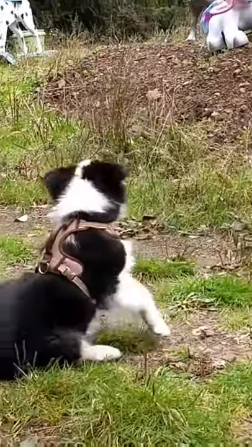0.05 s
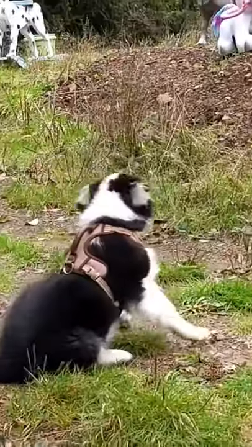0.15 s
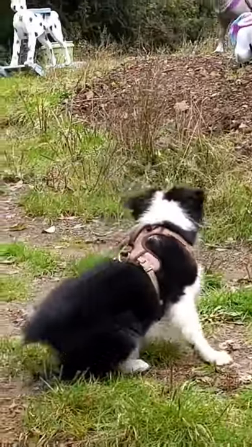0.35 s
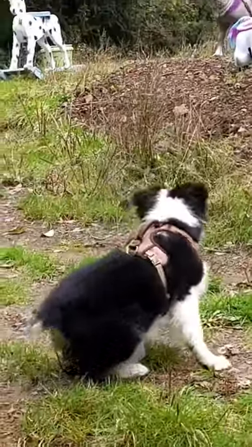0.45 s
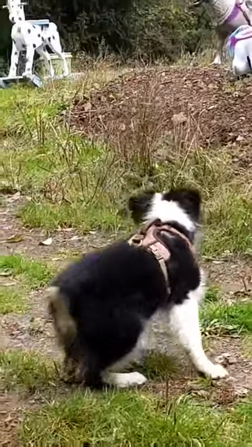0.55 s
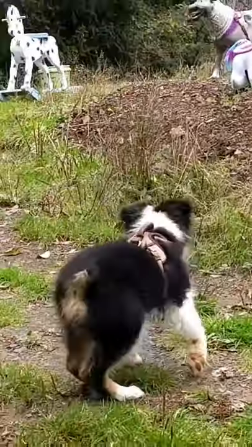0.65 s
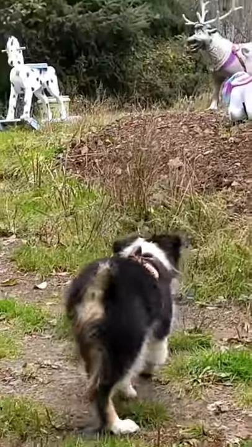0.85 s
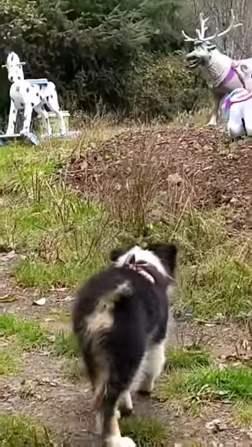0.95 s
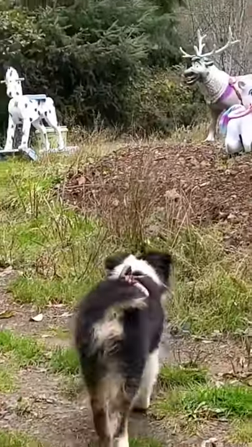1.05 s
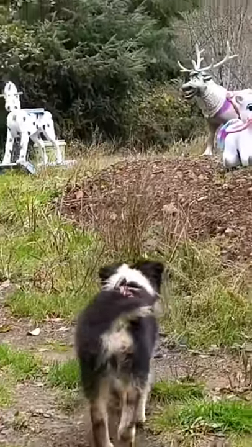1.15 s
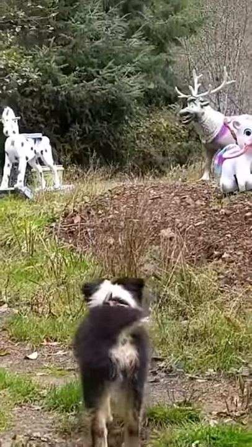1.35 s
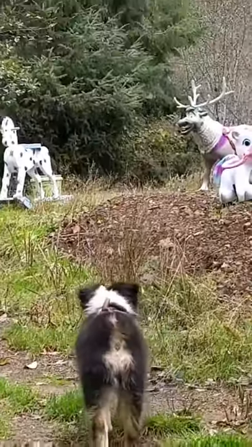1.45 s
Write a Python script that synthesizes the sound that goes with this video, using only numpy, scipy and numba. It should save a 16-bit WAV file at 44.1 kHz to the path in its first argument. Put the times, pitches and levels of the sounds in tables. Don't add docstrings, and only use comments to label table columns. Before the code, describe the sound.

Single sharp puppy yelp with a raspy start, trailing into a soft closed-mouth growl outside.

```python
import sys
import numpy as np
from scipy import signal
from scipy.io import wavfile
from scipy.ndimage import uniform_filter1d
from numba import njit

SR = 44100
rng = np.random.default_rng(int(sys.argv[2]) if len(sys.argv) > 2 else 0)


def ratio_of_db(decibels):
    return 10 ** (np.asarray(decibels, float) / 20)


def master_out(mix):
    frames = np.transpose(np.atleast_2d(mix))
    ceiling = np.clip(frames, -1, 1)
    pcm = np.round(ceiling * 32767).astype(np.int16)
    wavfile.write(sys.argv[1], SR, pcm)


N = 66150
T = np.arange(N) / SR

# time_s, pitch_hz, fundamental_db, octave_db, rasp_db, airflow_db
YELP_COURSE = [
    (0.205, 544.2, -43, -41.5, -46.5, -80.5),
    (0.239, 614.2, -25.5, -22, -26, -54),
    (0.255, 633.3, -20, -24, -26.5, -45.5),
    (0.267, 623.2, -14, -18, -37, -42.5),
    (0.291, 645.5, -21.5, -12.5, -32.5, -47.5),
    (0.331, 625.6, -18, -18, -39, -56.5),
    (0.347, 604.3, -18.5, -26.5, -39, -52.5),
    (0.363, 564, -28, -32.5, -35, -57.5),
    (0.4, 614.2, -44, -60, -56.5, -70),
]


def unit(x):
    return x / np.sqrt(np.mean(x ** 2))


def column(table, index):
    rows = np.array(table, float)
    return np.interp(T, rows[:, 0], rows[:, index])


def gate(start, end, edge):
    return np.clip(np.minimum(T - start, end - T) / edge, 0, 1) ** 2


def band(x, hz, width):
    return signal.lfilter(*signal.iirpeak(hz, hz / width, fs=SR), x)


def tract(x, table):
    out = 0
    for k, (hz, width, db) in enumerate(table):
        formant = band(band(x, hz, 1.3 * width), hz, 1.3 * width)
        out = out + (-1) ** k * ratio_of_db(db) * unit(formant)
    return out


def walk(rate):
    hold = int(SR / rate)
    steps = np.repeat(rng.standard_normal(N // hold + 1), hold)
    return unit(uniform_filter1d(uniform_filter1d(steps, hold), hold)[:N])


@njit
def folds(hz, jitter, alt, chance, size):
    out, phase, k = np.zeros(len(hz) + 1), 0., 0
    for i in range(len(hz)):
        step = hz[i] * np.exp(jitter[i] * chance[k]) / SR
        phase += step
        if phase >= 1:
            phase, k = phase - 1, k + 1
            pulse = size[k] ** jitter[i] * (alt[i] if k % 2 else 1 / alt[i])
            out[i] += pulse * phase / step
            out[i + 1] += pulse * (1 - phase / step)
    return out[:-1]


def pulses(hz, jitter, alt_db, scatter_db):
    chance = np.clip(rng.standard_normal((N // 40, 2)).T, -2, 2).copy()
    return folds(hz, jitter, ratio_of_db(alt_db / 2), chance[0], ratio_of_db(scatter_db * chance[1]))


def air():
    # centre_hz, level_db (per Hz)
    spectrum = [(15, -47), (25, -8), (69, -1), (340, -28), (1380, -33.5), (1530, -27.5), (1850, -32),
                (2170, -39.5), (15500, -52.5)]
    rows, out = np.array(spectrum), 0
    for hz in 28 * 2 ** np.arange(0, 9.2, 0.5):
        db = np.interp(np.log(hz), np.log(rows[:, 0]), rows[:, 1]) + 0.5 * walk(15)
        out = out + ratio_of_db(db) * band(band(rng.standard_normal(N), hz, hz / 2), hz, hz / 2)
    return unit(out) * ratio_of_db(-64)


def insects():
    # centre_hz, width_hz, level_db
    song_bands = [(11200, 1500, -88.5), (13600, 80, -100)]
    return tract(rng.standard_normal(N), song_bands)


def wind():
    rumble = unit(band(rng.standard_normal(N), 60, 49.0))
    return rumble * ratio_of_db(-63.5 + 2 * walk(10)) * gate(-0.05, 2, 0.4)


def rustles():
    # centre_s, level_db, centre_hz
    brushes = [
        (.045, -73, 1970),
        (.365, -61, 6310),
        (.465, -77, 11730),
        (1.05, -82.5, 13900),
        (1.175, -78.5, 14130),
        (1.349, -66, 690),
        (1.495, -67, 1500),
    ]
    out = 0
    for s, db, hz in brushes:
        burst = unit(band(rng.standard_normal(N), hz, hz / 2))
        out = out + ratio_of_db(db) * burst * np.exp(-((T - s) / 0.0039) ** 2)
    return out


def rough_voice():
    # centre_hz, width_hz, level_db
    croak_formants = [(210.5, 110, -6), (390, 46, -0.5), (542, 85, 6)]
    mouth_formants = [(740, 320, -0.5), (1130, 200, 4), (1500, 200, -2), (1700, 170, -3)]
    pulse_hz, jitter, scatter_db = 330, 0.25, 5.0
    slack = unit(pulses(pulse_hz + 0 * T, jitter + 0 * T, 0 * T, scatter_db))
    slack = slack + ratio_of_db(-3) * rng.standard_normal(N)
    rasp = tract(slack, mouth_formants) * ratio_of_db(column(YELP_COURSE, index=4)) * gate(0.186, 0.445, 0.032)
    onset = ratio_of_db(-33.5 - 220 * np.clip(0.235 - T, 0, 1)) * gate(0.186, 0.272, 0.022)
    late = ratio_of_db(-52.5) * gate(0.34, 0.37, 0.017)
    return rasp + tract(slack, croak_formants) * (onset + late)


def breath():
    # centre_hz, width_hz, level_db
    breath_formants = [(2447, 360, 0), (3080, 300, -4), (3501, 200, -3), (4800, 900, -20), (6000, 600, -19),
                       (7000, 450, -11.5), (8900, 1200, -12), (11060, 1800, -18), (15000, 900, -26)]
    flow = rng.standard_normal(N) * ratio_of_db(2 * walk(400))
    level_db = column(YELP_COURSE, index=5) - 4
    return tract(flow, breath_formants) * ratio_of_db(level_db) * gate(0.19, 0.47, 0.04)


def mouth_slaps():
    # centre_s, level_db, ring_hz, length_s
    slaps = [
        (.213, -30.5, 1168, 0.017),
        (.249, -18.5, 1300, 0.03),
        (.252, -23, 1096, .02),
        (.272, -19.5, 1191, 0.017),
        (.287, -15.5, 1165, .018),
        (.311, -14.5, 1150, 0.015),
        (.3, -37.5, 756.3, 0.056),
        (.326, -29, 1184, .02),
        (.357, -20, 1130, 0.016),
        (.368, -25.5, 1050, .014),
    ]
    out = 0
    for s, db, hz, length in slaps:
        envelope = np.exp(-((T - s) / (0.37 * length)) ** 2)
        out = out + ratio_of_db(db) * np.sqrt(2) * envelope * np.cos(2 * np.pi * hz * (T - s))
    return out


def clear_yelp():
    # multiple, level_db (relative to the octave)
    overtones = [(3, -28.5), (4, -40), (5, -44)]
    pitch_hz = column(YELP_COURSE, index=1) * (1 + 0.0052 * walk(150))
    phase = 2 * np.pi * np.cumsum(pitch_hz) / SR
    upper = np.cos(2 * phase + 1.2)
    for k, db in overtones:
        upper = upper + ratio_of_db(db + 3 * walk(60)) * np.cos(k * phase)
    fundamental = ratio_of_db(column(YELP_COURSE, index=2)) * np.cos(phase)
    upper = ratio_of_db(column(YELP_COURSE, index=3)) * upper
    return np.sqrt(2) * (fundamental + upper) * gate(0.222, 0.372, 0.017)


def growl():
    # time_s, pulse_rate_hz, throat_db, lips_db
    course = [(0.35, 220.2, -42, -23), (0.378, 209.2, -30.5, -34.5), (0.414, 202.4, -40.5, -47.5),
              (0.548, 171.7, -43, -52), (0.618, 134.2, -47.5, -62), (0.778, 124, -47, -65),
              (0.832, 156, -43.5, -55.5), (0.952, 176.2, -42.5, -52), (1.006, 172.2, -42.5, -52),
              (1.044, 153.7, -41.5, -54.5), (1.104, 184.8, -39.5, -51.5), (1.218, 177.7, -40.5, -53.5),
              (1.272, 160.5, -46.5, -57.5), (1.362, 128.2, -47.5, -67), (1.39, 139.6, -48, -61.5),
              (1.428, 142.8, -45, -61.5), (1.464, 131.7, -48.5, -71), (1.5, 133.3, -43.5, -55)]
    # centre_hz, width_hz, level_db
    throat_formants = [(85, 28, -11.5), (172.5, 121.5, 4.5), (380.2, 90, 1), (260, 53, -13.5),
                       (430, 71, -15)]
    lip_formants = [(607.5, 82, 2), (958, 232, -11), (1805, 110, -28), (3300, 150, -33.5),
                    (4445, 830, -35.5)]
    lock = gate(1.08, 1.6, 0.035)
    jitter = 0.16 * (1 - lock * (1 - 0.22))
    alternation_db, scatter_db = 1.5 + 3.5 * lock, 13.0
    train = unit(pulses(column(course, index=1), jitter, alternation_db, scatter_db))
    puff = rng.standard_normal(N) * (0.5 + unit(np.abs(band(train, 210.0, 300.0))))
    throat = unit(tract(train + ratio_of_db(-12) * puff, throat_formants)) * ratio_of_db(column(course, index=2))
    lips = unit(tract(train + ratio_of_db(4.5) * puff, lip_formants)) * ratio_of_db(column(course, index=3))
    return -(throat + lips * gate(0.33, 2, 0.066)) * gate(0.335, 2, 0.036)


def bush_echo(dog):
    # centre_hz, width_hz, level_db
    reflected_bands = [(630, 270, -26), (1200, 360, -40.5), (2000, 160, -27), (3300, 2000, -27.5),
                       (8000, 3900, -30)]
    t60_s, delay_s = 0.82, 0.012
    tail = rng.standard_normal(N) * ratio_of_db(-60 * T / t60_s) * np.clip(T / delay_s - 1, 0, 1)
    far = sum(ratio_of_db(db) * band(dog, hz, width) for hz, width, db in reflected_bands)
    return signal.fftconvolve(far, tail / np.sqrt(np.sum(tail ** 2)))[:N]


def scene():
    dog = rough_voice() + breath() + mouth_slaps() + clear_yelp() + growl()
    floor = air() + insects() + wind() + rustles()
    return (dog + bush_echo(dog) + floor)[None]


def top_cut(x):
    return signal.sosfilt(signal.butter(12, 15780, fs=SR, output="sos"), x)


def record(dry):
    return top_cut(dry)


dry = scene()
out = record(dry)
master_out(out)
```